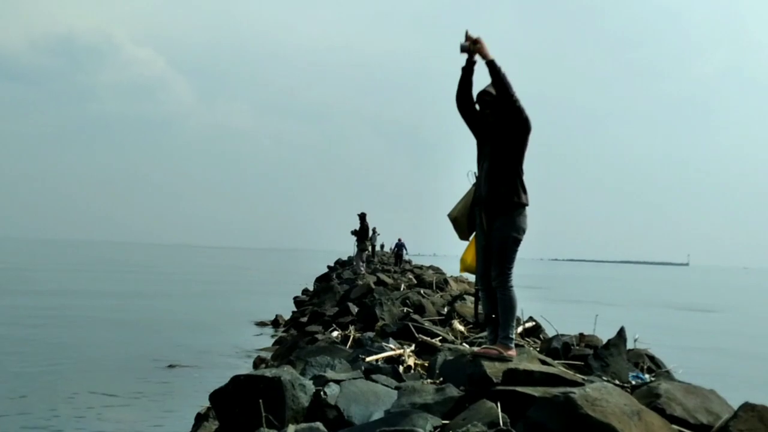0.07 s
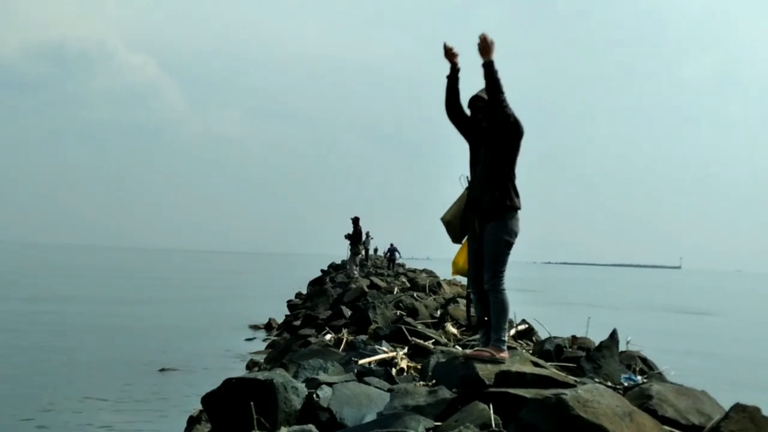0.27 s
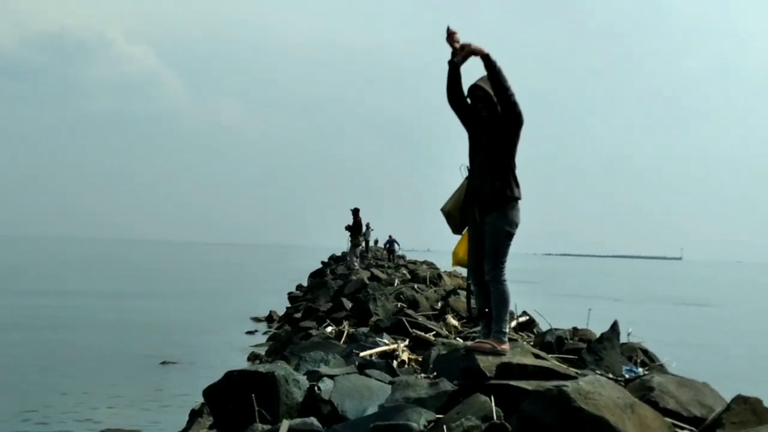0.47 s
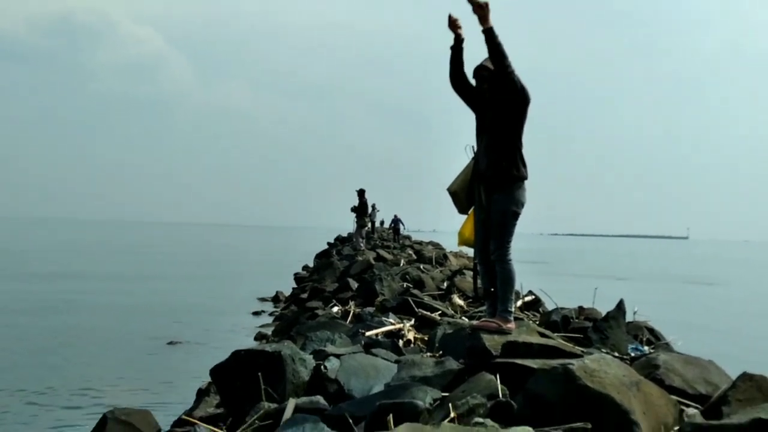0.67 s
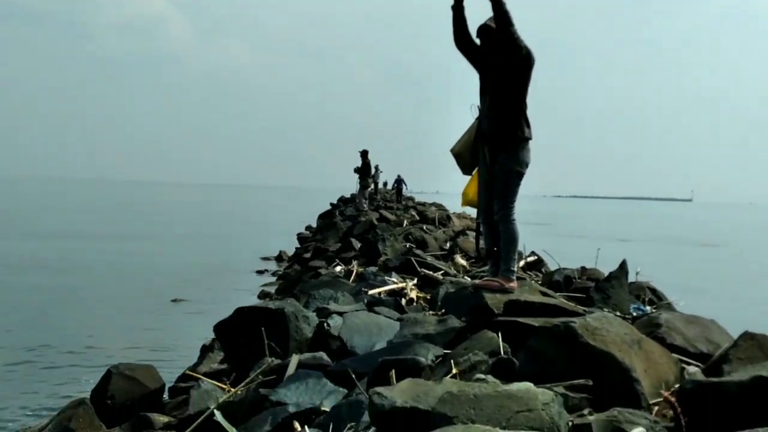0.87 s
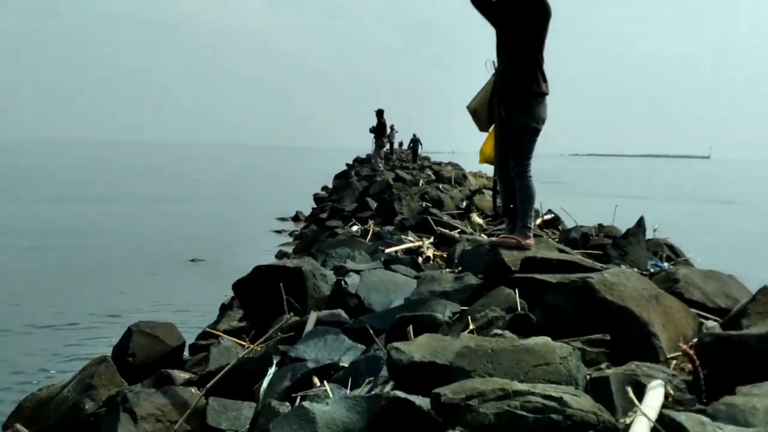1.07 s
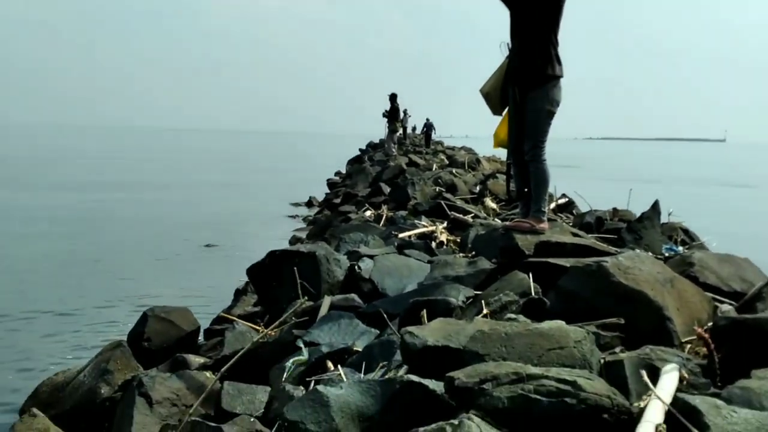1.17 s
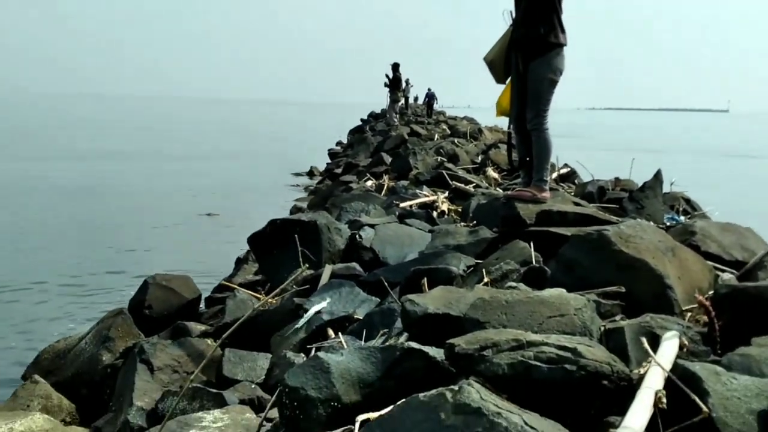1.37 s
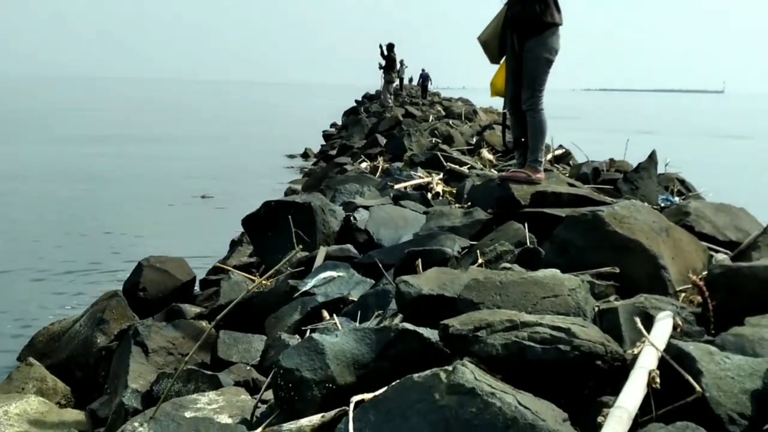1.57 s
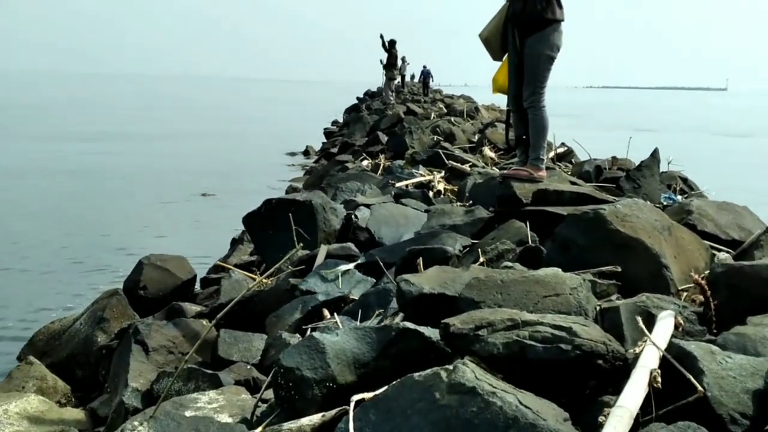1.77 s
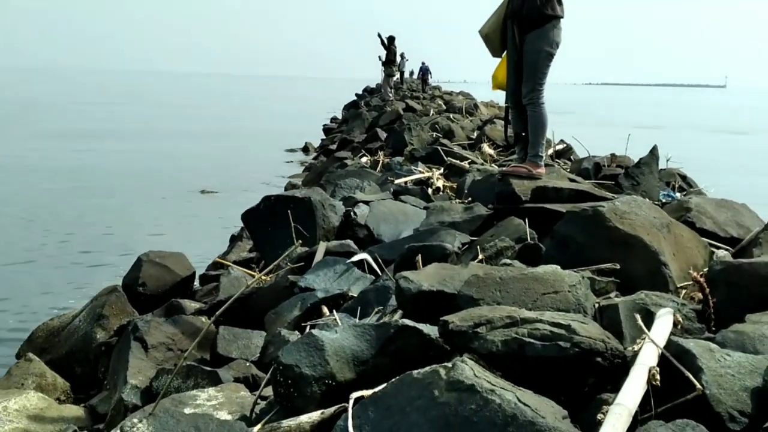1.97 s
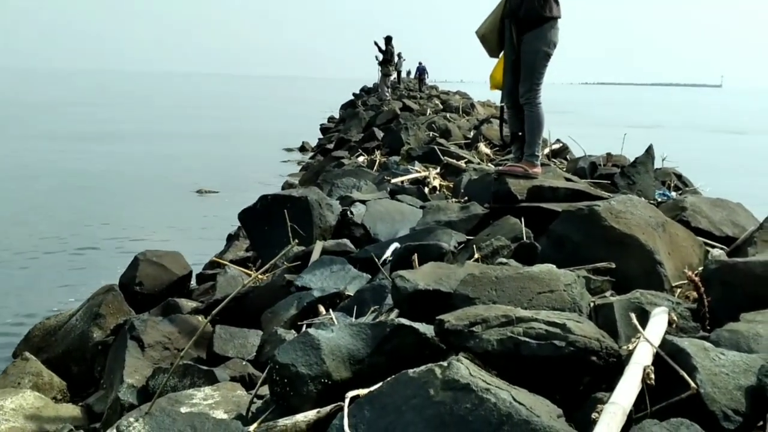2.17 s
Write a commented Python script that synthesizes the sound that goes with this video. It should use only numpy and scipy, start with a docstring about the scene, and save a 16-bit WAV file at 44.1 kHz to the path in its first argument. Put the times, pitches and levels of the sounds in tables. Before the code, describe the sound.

Small waves lap and trickle among breakwater stones over a low rumble.

```python
"""A low harbour rumble, a faint hiss and trickling water: small waves lap among breakwater stones.
The trickle is a crowd of tiny ringing bubbles, mixed with ticks of spray and a thin fizz.
Drips ring out in the gaps between the stones, and splashes snap as very short bursts of noise.
A small pair of microphones whistles near 9 kHz, which colours the hiss and the water."""
import sys
import numpy as np
from scipy import signal
from scipy.fft import rfft, irfft
from scipy.io import wavfile

SR = 44100
rng = np.random.default_rng(int(sys.argv[2]) if len(sys.argv) > 2 else 0)


def bounce(signal):
    """Save signal as a 16-bit WAV file at the path given by the first command-line argument."""
    frames = np.transpose(np.atleast_2d(signal))
    limited = np.clip(frames, -1, 1)
    pcm = np.round(limited * 32767).astype(np.int16)
    wavfile.write(sys.argv[1], SR, pcm)


N = 97328


def amp(db):
    """Turns decibels into a gain."""
    return 10 ** (np.asarray(db) / 20)


def evened(x):
    """Scales a sound to an average (RMS) level of 1."""
    return x / np.sqrt(np.mean(x ** 2) + 1e-20)


def curve_at(points, hz):
    """Reads a table of (pitch, value) points at any pitch."""
    pitches, values = np.transpose(points)
    return np.interp(np.log(hz + 1), np.log(pitches + 1), values)


def add(mix, start_s, sound):
    """Puts a sound into the mix at its start time."""
    part = mix[:, max(round(start_s * SR), 0):][:, :sound.shape[1]]
    part += sound[:, :part.shape[1]]


def sides(left_db):
    """Left and right gains that make the left louder by left_db."""
    gains = amp(np.array([.5, -.5])[:, None] * left_db)
    return 2 * gains / gains.sum(0)


def ring(noise, hz, width_hz):
    """Narrows noise until it rings around one pitch."""
    edges = [hz - width_hz / 2, hz + width_hz / 2]
    return evened(signal.sosfilt(signal.butter(3, edges, "bandpass", fs=SR, output="sos"), noise))


# The borders of the water's five bands, low to high: pitch_hz
BAND_EDGES_HZ = [300, 1200, 3000, 7000, 12000, 15700]

def band(x, k):
    """Keeps only band k of a sound; 0 is the lowest."""
    return signal.sosfilt(signal.butter(4, BAND_EDGES_HZ[k:k + 2], "bandpass", fs=SR, output="sos"), x)


# How alike the two microphones sound: pitch_hz, likeness (0 to 1)
LIKENESS = [(100, 0.93), (300, 0.85), (640, 0.59), (1400, 0.1), (8000, 0.072)]

def microphones(pair, colour, balance):
    """Colours two sounds and mixes them into left and right, most alike in the bass."""
    hz = np.fft.rfftfreq(N, 1 / SR)
    likeness = curve_at(LIKENESS, hz)
    left, other = rfft(pair)
    right = likeness * left + np.sqrt(1 - likeness ** 2) * other
    return irfft(np.array([left, right]) * sides(curve_at(balance, hz)) * amp(curve_at(colour, hz)), N)


# How far rumble and trickle lean left: pitch_hz, left_minus_right_db
SEA_BALANCE = [(100, 0.5), (500, 6), (1500, 5), (9000, 7.5)]
# The rumble's tone colour: pitch_hz, relative_level_db
RUMBLE_COLOUR = [(12, -55), (20, -12), (32, -34), (49, -6.5), (86, 1), (156, -9), (280, -18.5), (387, -32),
                 (422, -32), (1200, -85), (1560, -129), (2640, -120)]

def rumble(level_db=-41):
    """Sea and harbour make a steady low noise."""
    noise = microphones(rng.standard_normal((2, N)), RUMBLE_COLOUR, SEA_BALANCE)
    return noise / np.std(noise.mean(0)) * amp(level_db)


# The hiss's tone colour: pitch_hz, relative_level_db
HISS_COLOUR = [(500, -72), (1000, -59), (3000, -22), (7000, -13), (8100, -33), (8700, 13.5), (9800, 10.5),
               (10600, -86), (12000, -62), (16000, -44)]
# Which way the hiss leans: pitch_hz, left_minus_right_db
HISS_BALANCE = [(1000, -22), (6000, 2), (9000, 43), (12500, -37)]

def hiss(level_db=-63):
    """A faint steady hiss, strongest where the microphones whistle."""
    noise = microphones(rng.standard_normal((2, N)), HISS_COLOUR, HISS_BALANCE)
    return noise / np.std(noise.mean(0)) * amp(level_db)


# The water's tone colour through the microphones: pitch_hz, relative_level_db
WATER_COLOUR = [(300, -8.5), (600, -10.5), (1000, -24.5), (1400, -29.5), (1900, -23), (3000, -33.5),
                (4200, -20.5), (5200, -19.5), (7900, -5), (8800, 9.5), (9900, 19), (10800, -6.5),
                (12500, -10), (15000, -22), (16300, -29)]
# How loud the trickle's five bands are: time_s, low_db, mid_db, upper_mid_db, high_db, top_db
TRICKLE_LEVELS = [(0, -64.5, -72, -95, -58, -96), (.17, -72, -78, -78.5, -71, -82),
                  (0.199, -62, -78, -62, -51.5, -76), (.33, -62, -77, -65.5, -58, -73),
                  (.37, -64.5, -77, -50, -53.5, -69), (0.453, -80, -67, -70, -54, -78),
                  (0.479, -63.5, -63, -49, -53, -54), (.6, -61.5, -81.5, -63.5, -67, -73),
                  (.64, -55, -65, -57.5, -50.5, -62), (.72, -51.5, -61, -64, -63, -54),
                  (0.759, -58, -52.5, -44, -84, -47), (.83, -57.5, -59, -60, -50, -72),
                  (.92, -58, -57, -71, -52.5, -99), (1.053, -53.5, -63, -54.5, -52.5, -101),
                  (1.15, -59.5, -74.5, -75.5, -58, -94), (1.23, -66.5, -74, -68, -62, -90),
                  (1.27, -55, -94, -56.5, -58, -64), (1.351, -67, -53, -51, -78, -67),
                  (1.42, -77, -75, -66, -49, -96), (1.55, -74.5, -91, -75.5, -68, -83),
                  (1.7, -72.5, -74.5, -81, -63, -84), (1.818, -62, -92, -60, -67, -53),
                  (1.92, -72, -78, -70.5, -59.5, -89), (2.0, -68.5, -88, -78, -97, -89),
                  (2.11, -87, -81.5, -71.5, -57.5, -72), (2.21, -78, -89, -70, -66, -98)]

def trickle(spray_gain=0.21, fizz_gain=0.22):
    """Bubbles and spray over a thin fizz; each band swells and fades as the water runs."""
    times_s, *band_levels_db = np.transpose(TRICKLE_LEVELS)
    t, out = np.arange(N) / SR, np.zeros((2, N))
    ticks = spray_gain * band(spray(), 3)
    grains = bubbles() + ticks + fizz_gain * rng.standard_normal((2, N))
    water = microphones(grains, WATER_COLOUR, SEA_BALANCE)
    for k, levels_db in enumerate(band_levels_db):
        part = band(water, k)
        out += part / np.std(part.mean(0)) * amp(np.interp(t, times_s, levels_db))
    return out


def spray(ticks_per_s=85, spread_db=4.5, fade_s=.0015):
    """Spray makes dry ticks at random moments, reaching both microphones at once."""
    strength = amp(spread_db * np.minimum(rng.exponential(1, N), 4))
    hits = strength * (rng.random(N) < ticks_per_s / SR)
    fade = np.exp(-np.arange(300) / SR / fade_s)
    return evened(signal.oaconvolve(hits, fade)[:N] * rng.standard_normal((2, N)))


def bubbles(sizes=48, spread_db=4.5, clump_db=7):
    """Tiny bubbles burst at random; smaller ones ring higher and come more often."""
    out, clump_marks = np.zeros((2, N)), np.arange(0, N + 2000, 2000)
    for hz in np.geomspace(BAND_EDGES_HZ[0], BAND_EDGES_HZ[-1], sizes):
        cycles = hz * np.arange(2500) / SR
        ring_cycles = 17.6 + hz / 480
        tone = cycles * np.exp(-3 * cycles / ring_cycles) * np.sin(2 * np.pi * cycles)
        tone = tone * np.sqrt(hz) / np.linalg.norm(tone)
        # Each size comes in louder and quieter clumps.
        clumps = np.interp(np.arange(N), clump_marks, rng.standard_normal(len(clump_marks)))
        strength = amp(spread_db * np.minimum(rng.exponential(1, (2, N)), 4) + clump_db * clumps)
        bursts_per_s = 1.45 * hz / sizes
        bursts = strength * (rng.random((2, N)) < bursts_per_s / SR)
        out += signal.oaconvolve(bursts, tone[None], axes=1)[:, :N]
    return evened(out)


# Single drips and bubbles: start_s, peak_db, pitch_hz, left_minus_right_db, ring_cycles
DRIPS = [(0.2752, -57.5, 1440, 26, 12), (0.4205, -54.5, 2065, 33, 34), (0.4822, -46, 2730, 14, 12),
         (0.5147, -41.5, 2570, 30, 4.9), (0.6208, -49, 2610, 12, 9.1), (0.7344, -39, 1605, -5, 10),
         (0.7433, -40, 1820, -3, 7.2), (0.7761, -50, 2120, -11, 18), (0.8224, -43.5, 1880, 8, 4),
         (0.8516, -47.5, 1140, 7, 23), (0.8664, -40, 1640, 9, 13), (0.9074, -51.5, 970, 12, 20),
         (0.927, -49, 1880, 2, 20), (0.97, -48.5, 2000, 13, 8.9), (1.1414, -50, 960, 3, 14),
         (1.2524, -43, 2300, 18, 3.7), (1.725, -47, 1900, -11, 6.7), (1.7806, -32, 1925, 1.5, 8.3),
         (1.8024, -36.5, 1884, -1.5, 16), (1.8867, -55.5, 1717, 2.0, 18), (1.6292, -62, 3293, 3, 75),
         (1.696, -65.5, 3610, 0, 76), (1.7478, -50.5, 3690, 3, 41), (1.8021, -39.5, 3783, -2.5, 26),
         (0.126, -47.5, 785, 1.5, 13), (0.497, -53, 708, -5, 18), (0.796, -44.5, 446, -3, 7),
         (1.7474, -48, 1790, -1, 17), (1.201, -36, 441, 0.5, 6.6)]

def drip(start_s, peak_db, pitch_hz, left_db, ring_cycles, roughness=.5, gap_db=-11.5, gap_fade_s=0.028):
    """A bubble swells softly into a short, rough note; the gap between the stones rings on."""
    t = np.arange(7000) / SR
    progress = pitch_hz * t / ring_cycles
    gurgle = ring(rng.standard_normal((2, len(t))), pitch_hz, width_hz=0.32 * pitch_hz)
    swell = (4 * progress) ** 2 * np.exp(2 - 8 * progress)
    bubble = swell * (np.sin(2 * np.pi * pitch_hz * t) + roughness * gurgle)
    gap = np.minimum(3 * progress, 1) * np.exp(-t / gap_fade_s) * gurgle
    return start_s, amp(peak_db) * sides(left_db) * (bubble + amp(gap_db) * gap)


# Where the top of a splash rings: pitch_hz, width_hz, relative_level_db
TOP_RINGS = [(11300, 420, 5), (14010, 510, -2.5)]
# Splashes: start_s, peak_db, pitch_hz, low_ring_hz, low_ring_db, top_db, length_s
# peak_db is for the main ring; low_ring_db and top_db are compared with it.
SPLASHES = [(0.192, -25, 9060, 7100, -49, -41, 0.0053), (0.2704, -30, 9250, 3650, -12, -30, 0.015),
            (0.2934, -34, 9800, 3600, -22, -46, 0.006), (0.3535, -33.5, 10120, 5730, -30, -33, 0.0083),
            (0.3663, -39, 9000, 5750, -9, -29, 0.0071), (0.4667, -24, 8550, 3470, -21.5, -18, 0.0076),
            (0.4842, -21, 9300, 3150, -17, -18, 0.005), (0.4961, -33.5, 9300, 5100, -4, 5.5, 0.0045),
            (0.516, -21.5, 9320, 3000, -15, -30, 0.0051), (0.5544, -34, 10770, 5500, -28, -36, 0.0065),
            (0.5633, -26, 9930, 6750, -15, -41, 0.01), (0.6214, -18, 9360, 6000, -39, -8, 0.011),
            (0.678, -28, 9700, 2420, -14, -9, 0.009), (0.6959, -21, 9020, 4800, -17, -8, 0.0042),
            (0.7336, -12, 9200, 4180, -22, -14.5, 0.0087), (0.8026, -29, 9500, 6330, -9, -10.5, 0.0053),
            (0.8258, -27.5, 8970, 2470, -43, -36, 0.0081),
            (0.8887, -29.5, 9600, 5600, -13.5, -37.5, 0.0082),
            (0.9568, -21.5, 9490, 3660, -23, -50, 0.0024), (1.0046, -31, 9700, 3950, -8, -22, 0.0061),
            (1.0308, -32, 9860, 3970, -9, -44, 0.012), (1.072, -32.5, 9650, 4160, -14, -48, 0.0043),
            (1.1974, -31.5, 9600, 5940, -2, -28, 0.011), (1.24, -18.5, 9050, 5250, -49, -15.5, 0.0082),
            (1.2545, -30, 8240, 2370, -40, -14, 0.005), (1.276, -24.5, 9030, 7000, -37, -7, 0.0056),
            (1.303, -26, 9400, 2440, -19.5, -25, 0.0078), (1.3137, -25, 8800, 6000, -38, -18, 0.0067),
            (1.3199, -25, 8200, 6900, -32, 4, 0.023), (1.33, -16.5, 9270, 6600, -21, -7.5, 0.0054),
            (1.3787, -28.5, 9760, 6600, -31, -10, 0.0067), (1.413, -32, 8600, 6940, -29, -8, 0.0044),
            (1.4506, -29.5, 8440, 6440, -54, -25, 0.0065), (1.7082, -31, 8600, 3560, -41, -16, 0.013),
            (1.7497, -31.5, 9400, 6400, -13, -27, 0.0056), (1.7655, -31, 8300, 6500, -5, -30, 0.0062),
            (1.7828, -16, 8350, 3880, -20.5, -9.5, 0.0098), (1.8098, -29.5, 8850, 6150, -6, -29, 0.0057),
            (1.8764, -36, 8400, 6740, -30, -9, 0.0071), (1.9188, -39.5, 8100, 6400, -8.5, -4, 0.0054),
            (1.984, -35, 10140, 2540, -46, -1, 0.013), (2.013, -37, 8730, 2650, -47, -12, 0.0083),
            (2.0948, -42, 9300, 6160, -12, -20, 0.022)]

def splash(start_s, peak_db, pitch_hz, low_ring_hz, low_ring_db, top_db, length_s):
    """Water snaps in a lumpy burst with a short wet tail; loud, bright ones lead with a crack."""
    lump_db, tail_db, tail_fade_s = 5, -16, 0.023
    lead_s, crack_s, likeness = .002, .0015, 0.073
    t = np.arange(5000) / SR
    progress = t / length_s
    left, other, wobble = rng.standard_normal((3, len(t)))
    noise = np.array([left, likeness * left + np.sqrt(1 - likeness ** 2) * other])
    lumps = evened(signal.oaconvolve(wobble, np.hanning(70), "same"))
    burst = np.exp(-11 * (progress - .5) ** 2) * amp(lump_db * lumps)
    tail = amp(tail_db) * np.minimum(progress, 1) ** 2 * np.exp(-t / tail_fade_s)
    loudness = burst / burst.max() + tail
    main = ring(noise, pitch_hz, width_hz=1490)
    low = ring(noise, low_ring_hz, width_hz=0.22 * low_ring_hz)
    top_rings = sum(amp(db) * ring(noise, hz, width_hz) for hz, width_hz, db in TOP_RINGS)
    top = evened(evened(band(noise, 4)) + top_rings)
    body = loudness * (main + amp(low_ring_db) * low + amp(top_db) * top)
    crack_pulse = np.exp(-((t - lead_s - crack_s) / crack_s) ** 2)
    crack = amp(-11 + (peak_db + top_db) / 2) * crack_pulse * evened(band(noise, 1) + band(noise, 2))
    sound = (body + crack) / abs(loudness * main).max()
    return start_s - lead_s, amp(peak_db) * sides(left_db=3) * sound


def scene():
    """Splashes and drips land on top of the rumble, hiss and trickle."""
    mix = rumble() + hiss() + trickle()
    for row in SPLASHES:
        add(mix, *splash(*row))
    for row in DRIPS:
        add(mix, *drip(*row))
    return mix


def record(dry):
    """Cuts away the very highest treble."""
    cutoff_hz = 16500
    treble_cut = signal.firwin(511, cutoff_hz, window=("kaiser", 9), fs=SR)
    return signal.oaconvolve(dry, treble_cut[None], "same")


dry = scene()
out = record(dry)
bounce(out)
```